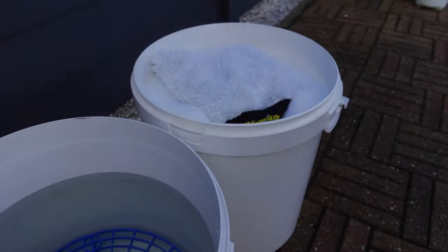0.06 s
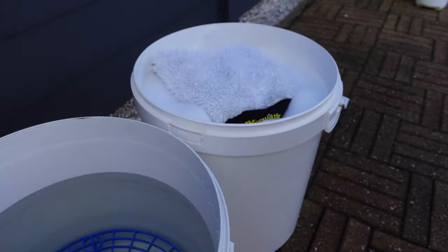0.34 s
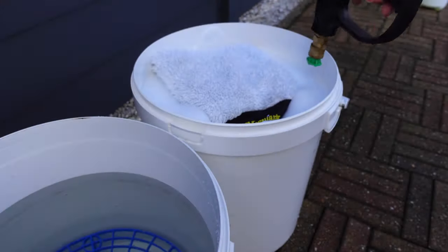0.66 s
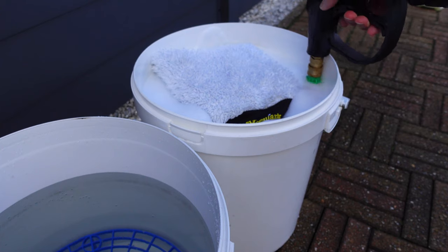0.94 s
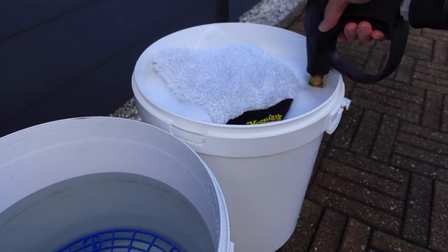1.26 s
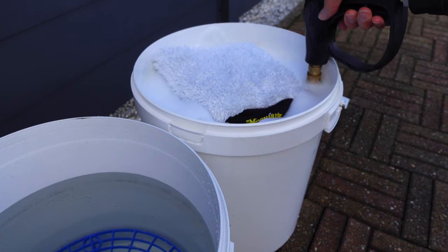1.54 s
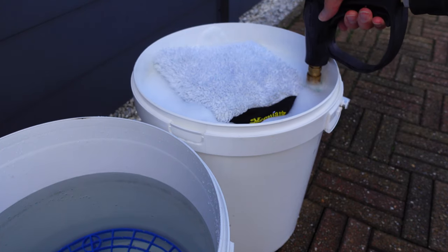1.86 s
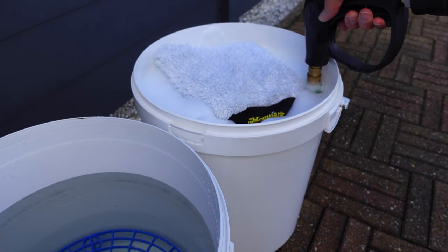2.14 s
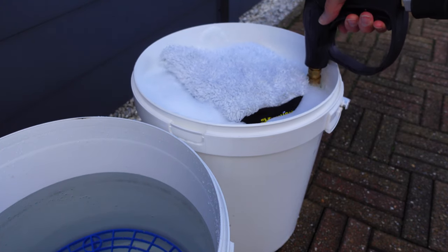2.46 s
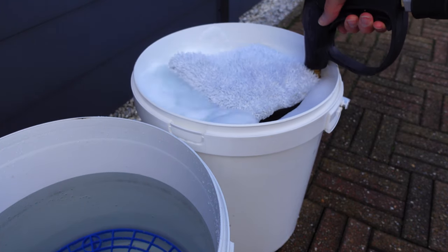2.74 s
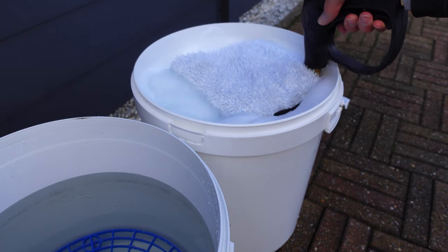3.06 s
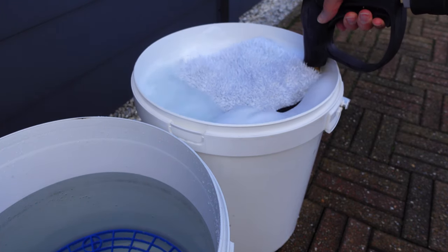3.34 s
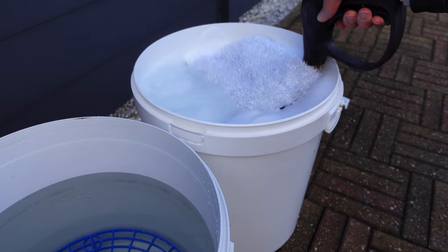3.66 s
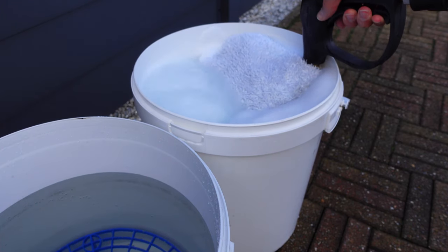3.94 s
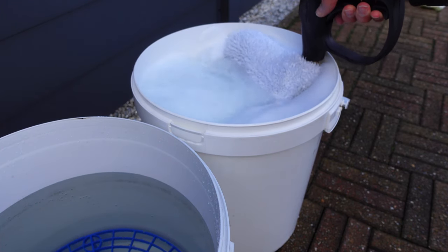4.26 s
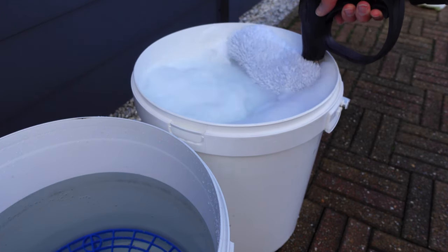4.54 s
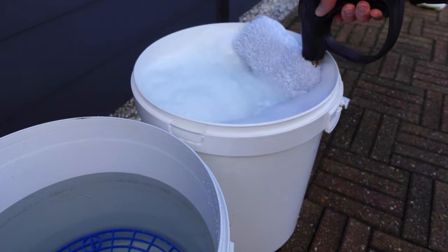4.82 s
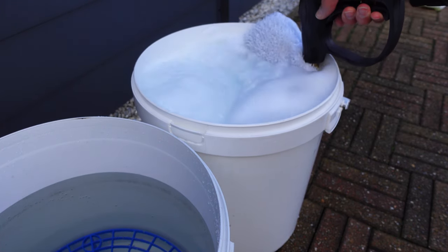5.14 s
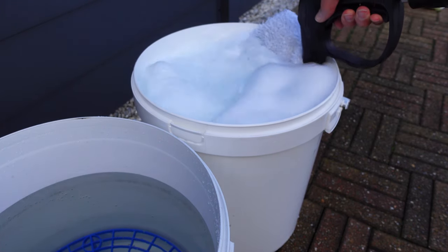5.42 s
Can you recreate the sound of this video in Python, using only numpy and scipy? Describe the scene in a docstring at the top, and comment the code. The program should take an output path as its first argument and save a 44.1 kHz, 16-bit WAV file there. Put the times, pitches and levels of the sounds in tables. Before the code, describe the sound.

Close to the microphone in a quiet yard, a pressure washer foams up a bucket of shampoo water. A faint rustle and a few small plastic taps lead to a snapping trigger and a brief spurt. Then the jet runs continuously, first with bright, crackling hiss and splutters, later smoother and muffled by foam while the bubbling churn grows fuller. The pump hums steadily beneath the water.

```python
"""Faint rustle, then a nozzle tapping plastic: a pressure washer at a bucket of shampoo water.
The bucket stands on a quiet paved yard, close to the stereo microphone and dead centre.
The trigger clicks, the jet spurts once, then hisses and spits until rising foam swallows the nozzle.
Air driven under water churns as a dense cloud of ringing bubbles,
and the pump's pulsation hums through the water."""
import sys
import numpy as np
from scipy import signal
from scipy.fft import rfft, irfft, next_fast_len
from scipy.io import wavfile

SR = 44100
rng = np.random.default_rng(int(sys.argv[2]) if len(sys.argv) > 2 else 0)


def transcribe(u):
    """Save the signal u as a 16-bit wav file named by the first command-line argument.

    u: samples, shape (n,) or (channels, n), limited to [-1, 1]; the rate is SR.
    q: integer samples, one column per channel.
    """
    v = np.clip(np.atleast_2d(u).T, -1, 1)
    q = np.round(v * 32767).astype(np.int16)
    wavfile.write(sys.argv[1], SR, q)


N = 246519

# hush of the yard: (frequency [Hz], relative level [dB])
YARD_SPECTRUM = [(30, -20), (70, -14), (130, -12.5), (250, -16), (470, -14.5), (800, -12), (1000, -7),
                 (1800, -8.5), (2500, -15.5), (3400, -29), (4800, -23), (6500, -17.5), (9000, -15),
                 (15600, -16)]
# side-channel gain for the yard, and for the echoes with the nozzle open and under foam:
# (frequency [Hz], gain [dB])
YARD_WIDTH = [(150, -6), (400, -3), (1200, -9.5), (3500, -11), (8000, -5), (15000, -8)]
OPEN_WIDTH = [(60, -10), (110, -24), (200, -17), (380, -18), (700, -16.5), (1290, -19), (2380, -42),
              (4400, -17.5), (8120, -13), (15000, -25)]
COVERED_WIDTH = [(60, -25), (110, -70), (200, -19), (380, -18.5), (700, -14), (1290, -18), (2380, -23),
                 (4400, -15.5), (8120, -8.5), (15000, -12)]
# faint rustle of the gun, then the rim's short ring after the first tap:
# (time [s], length [s], centre [Hz], level [dB])
RUSTLE_AND_RIM_RING = [(0.172, 0.048, 1060, -60.5), (0.18, 0.06, 190, -60), (0.14, 0.11, 9000, -65),
                       (0.17, 0.64, 9000, -64.5), (0.413, 0.018, 8000, -63), (0.54, 0.18, 170, -69.5),
                       (0.695, 0.019, 232, -57), (0.81, 0.11, 560, -62)]
# pump tones: (multiple of the shaft rate, relative level [dB])
PUMP_ORDERS = [(2, -66), (3, -57.5), (4, -58.5), (5, -56.5), (6, -45.5), (7, -83), (8, -39.5), (9, -44),
               (10, -40.5), (12, -40.5), (13, -47.5)]

# nozzle against the rim: (time [s], level [dB])
RIM_TAPS = [(0.7962, -42.5), (0.857, -52), (0.876, -58), (0.919, -49), (0.982, -50)]
# modes of bucket wall and plastic gun: (frequency [Hz], relative level [dB], multiple of the ring time)
RIM_MODES = [(323, -6, 1.1), (430, -2.5, 2), (617, -10, 1), (713, -1.5, 2.2), (996, -6, 1.1),
             (1550, -10, .8)]
GUN_MODES = [(320, -13, 0.65), (379, -4, 1.4), (520, -11, 0.86), (640, -3, 0.78), (974, -8, 1.4),
             (1520, -17, 1.2), (2050, -17, .5)]
# trigger and valve: (time [s], body level [dB], snap level [dB], ring time [s])
TRIGGER_KNOCKS = [(0.943, -36, -44, 0.086), (0.994, -48, -39, .04), (1.0018, -26.5, -20, 0.056),
                  (1.21, -33, -44, 0.05)]
# a spurt, then steady flow: (start [s], rise [s], stop [s], fall [s])
TRIGGER_PULLS = [(0.996, 0.041, 1.169, 0.069), (1.238, 0.09, 6.0, .06)]

# tone of the bubble cloud: (frequency [Hz], gain [dB])
CHURN_COLOUR = [(130, -42), (200, -23.5), (290, -22.5), (345, -10.5), (400, -5.5), (520, 0), (680, -1),
                (760, -4), (980, 0.5), (1250, -3.5), (1500, 0.5), (1800, -2.5), (2450, -5.5), (2950, -9),
                (3400, -15)]
# coarseness lifts big bubbles and thins small ones: (time [s], shift [dB])
COARSENESS = [(1.05, 2.5), (1.4, 1.5), (3.0, -1.5), (4.1, 0.5), (4.9, 2.5), (5.59, 4.5)]
# slugs of air dragged under: (time [s], length [s], boost [dB], added coarseness [dB])
SURGES = [(1.304, 0.12, 3.5, -4.5), (1.459, 0.15, 4.5, -0.5), (1.56, 0.23, 8, -2), (1.808, 0.21, 6.5, -1),
          (2.158, 0.3, 6, 2), (2.508, 0.25, 5.5, -1), (2.733, 0.19, 4, 1.5), (4.676, 0.37, 3, 0)]
# gulps in the water, and the pump's brief hum as the flow restarts:
# (time [s], length [s], centre [Hz], level [dB])
GULPS_AND_HUM = [(1.01, 0.053, 413, -35.5), (1.012, 0.034, 670, -27.5), (1.05, 0.028, 1400, -38),
                 (1.207, 0.085, 553, -38.5), (1.275, 0.11, 550, -34), (1.6, .05, 1180, -26),
                 (1.675, 0.096, 1030, -25.5), (1.695, 0.057, 557, -28), (1.89, 0.098, 1540, -28.5),
                 (2.185, 0.05, 510, -33.5), (2.25, 0.14, 395, -41), (2.535, 0.12, 1580, -25.5),
                 (2.63, 0.095, 2120, -30), (2.8, 0.091, 568, -26), (2.815, 0.072, 1040, -27.5),
                 (2.935, 0.034, 567, -26.5), (3.12, 0.12, 2220, -33), (4.01, 0.17, 2050, -31.5),
                 (4.72, 0.062, 1130, -22.5), (4.8, 0.1, 1020, -27.5), (4.845, 0.066, 580, -25.5),
                 (5.085, .05, 560, -24), (5.175, 0.058, 560, -26.5)]
# resonances of the bucket, open and foam-filled: (frequency [Hz], width [Hz], boost [dB])
BUCKET_RINGS = [(1030, 280, 3), (1444, 180, 5), (1910, 26, 5), (2230, 120, 6.5), (2410, 105, 5.5),
                (2460, 42, 5.5), (2895, 140, 5.5)]
FOAM_RINGS = [(1130, 41, 5.5), (1360, 37, 4.5), (1525, 32, 0.5), (1634, 48, 2.5), (1900, 55, 2.5),
              (2420, 50, 3.5), (2480, 32, 6)]

# hiss as nozzle and water move against each other: (time [s], relative level [dB])
HISS_LEVEL = [(1.05, -31), (1.3, -33), (1.45, -28.5), (1.63, -36.5), (1.78, -31), (1.96, -32.5),
              (2.12, -25.5), (2.37, -29), (2.53, -33), (2.8, -34.5), (3.02, -30), (3.58, -33), (3.8, -32),
              (4.2, -33.5), (4.32, -37), (4.7, -35.5), (5.1, -39), (5.59, -39)]
# tone of the hiss, open and under foam: (frequency [Hz], gain [dB])
OPEN_HISS = [(1880, 3), (3200, 3.5), (3580, -0.5), (4310, 3.5), (4610, 3), (6630, 3), (9810, -4),
             (13700, -11.5), (15600, -15)]
COVERED_HISS = [(1880, -39), (3200, 3.5), (3650, -3.5), (4100, -0.5), (5230, 1.5), (6720, -2), (8370, -4.5),
                (9060, -7), (11300, -7), (15600, -15)]
# pitch set by the gap between nozzle and water: (time [s], centre [Hz], boost [dB])
GAP_FOCUS = [(1.05, 7500, 12), (1.5, 5130, -4), (2.12, 6700, 8.5), (2.35, 8600, 7), (2.65, 7100, 1),
             (3.0, 5340, 6.5), (4.4, 7000, 4), (5.59, 8500, 4)]
# thin ringing of the nozzle under foam: (frequency [Hz], width [Hz], boost [dB])
NOZZLE_RINGS = [(4210, 140, 3), (4760, 90, -0.5), (5390, 55, 5.5), (6280, 140, -2), (6680, 190, 4),
                (7490, 40, 8), (7660, 160, 3), (9010, 200, 6.5), (9830, 260, 3.5), (11000, 150, 2.5),
                (11500, 70, 6), (13060, 250, 4)]
# the mist chokes for an instant: (time [s], length [s])
CHOKES = [(1.693, 0.018), (1.815, 0.017), (1.968, 0.034), (2.048, 0.028), (2.448, 0.089)]
# the jet tears the surface: (time [s], length [s], centre [Hz], level [dB])
SPITS = [(1.208, .02, 6500, -48), (1.428, 0.043, 13000, -35), (1.497, .022, 11900, -34),
         (1.713, .02, 13000, -30), (1.739, .016, 13500, -35), (1.762, .038, 10900, -32.5),
         (1.803, .013, 11500, -34), (1.868, 0.033, 11700, -25), (1.919, 0.023, 8450, -26.5),
         (1.925, 0.0074, 13000, -29), (1.95, 0.014, 9500, -31), (1.983, 0.012, 9000, -29),
         (2.01, 0.01, 10500, -29), (2.026, 0.01, 11500, -27), (2.148, .012, 12000, -39),
         (2.397, 0.014, 11500, -29), (2.427, 0.016, 10900, -29), (2.486, 0.0082, 9500, -27.5),
         (2.501, 0.0039, 8900, -22.5), (2.519, 0.0055, 9600, -23.5), (2.528, 0.0081, 6540, -27),
         (2.72, 0.051, 11000, -42), (2.81, 0.027, 11000, -44), (2.99, .07, 9900, -39.5),
         (4.2, 0.041, 9500, -40)]
# bounce off the bucket wall, faint under foam: (time [s], delay [s], echo share)
WALL_ECHO = [(1.0, 0.0023, 0.37), (1.5, .0022, 0.77), (1.8, 0.0021, 0.2), (2.5, .0019, 0.25),
             (2.7, 0.0026, .05)]


def from_db(db):
    """Decibels to gain."""
    return 10 ** (np.asarray(db) / 20)


def unit_power(x):
    """Scale to an RMS of 1."""
    return x / np.sqrt(np.mean(x ** 2) + 1e-20)


def in_time(rows):
    """One curve per column after the time, at every sample."""
    times, *columns = np.transpose(rows)
    return [np.interp(np.arange(N) / SR, times, column) for column in columns]


def ramp(start_s, takes_s):
    """Rise from 0 to 1."""
    return np.clip((np.arange(N) / SR - start_s) / takes_s, 0, 1)


def swell(start_s, length_s):
    """One rounded rise and fall, 0 to 1 and back."""
    x = ramp(start_s, length_s)
    return (4 * x * (1 - x)) ** 0.46


def decay(t, t60):
    """Die away by 60 dB in t60 seconds."""
    return from_db(-60 * t / t60)


def drift(rate_hz):
    """Smooth random wander of spread 1."""
    step, settle = 40, 2000
    pole = np.exp(-2 * np.pi * step * rate_hz / SR)
    noise = rng.standard_normal(N // step + settle + 2)
    slow = signal.lfilter([1], [1, -2 * pole, pole * pole], noise)[settle:]
    return np.interp(np.arange(N) / step, np.arange(len(slow)), unit_power(slow))


def colour(x, points):
    """Filter by a curve of (frequency [Hz], gain [dB])."""
    size = next_fast_len(N + SR // 4)
    hz, db = np.transpose(points)
    gain = from_db(np.interp(np.log(np.fft.rfftfreq(size, 1 / SR) + 1), np.log(hz), db))
    return irfft(rfft(x, size) * gain, size)[..., :N]


def band(x, low_hz, high_hz, order=2):
    """Band-pass, unit power."""
    edges = np.clip([low_hz, high_hz], 10, .49 * SR)
    return unit_power(signal.sosfilt(signal.butter(order, edges, "band", fs=SR, output="sos"), x))


def ring(clicks, hz, t60):
    """Each click sets a damped tone ringing."""
    radius, angle = from_db(-60 / (t60 * SR)), 2 * np.pi * hz / SR
    return signal.lfilter([1, 0, -1], [1, -2 * radius * np.cos(angle), radius ** 2], clicks + 1e-18)


def resonate(x, peaks):
    """Lift narrow resonances out of a sound."""
    return x + sum((from_db(db) - 1) * signal.lfilter(*signal.iirpeak(hz, hz / width, fs=SR), x)
                   for hz, width, db in peaks)


def grains(per_s, spread_db):
    """Random clicks of uneven size."""
    sizes = from_db(spread_db * np.minimum(rng.exponential(1, N), 4)) * rng.choice([-1, 1], N)
    return sizes * (rng.random(N) < per_s / SR)


def bursts(rows, band_ratio, spread_db=1.5, edge_share=0.52):
    """Puffs of dense clicks, each around its own pitch; a small edge share makes them abrupt."""
    out = np.zeros(N)
    clicks = grains(30000, spread_db)
    for s, length_s, hz, db in rows:
        at, size = int(s * SR), int(length_s * SR)
        puff = unit_power(band(clicks[:at + size], hz / band_ratio, hz * band_ratio)[at:])
        out[at:at + size] += from_db(db) * puff * signal.windows.tukey(size, edge_share)
    return out


def foam_cover():
    """Share of the nozzle that the rising foam covers."""
    return ramp(start_s=2.64, takes_s=0.49)


def by_cover(in_open, under_foam):
    """Pass from one value to the other as the foam covers the nozzle."""
    return in_open + (under_foam - in_open) * foam_cover()


def flow(dribble=0.045):
    """Water through the nozzle, 0 to 1; it sinks to a dribble between pulls."""
    pulled = sum(ramp(start, rise) * (1 - ramp(stop - fall, fall))
                 for start, rise, stop, fall in TRIGGER_PULLS)
    return np.maximum(pulled, dribble * np.maximum.accumulate(pulled))


def yard(level_db=-58):
    """The faint hush all round the microphone, as mid and side."""
    mid, side = from_db(level_db) * unit_power(colour(rng.standard_normal((2, N)), YARD_SPECTRUM))
    return mid, colour(side, YARD_WIDTH)


def reflections(x, t60, count):
    """Early echoes off bucket, paving and wall, within a few metres, as strong as the direct sound."""
    lags_s = rng.uniform(.002, .04, count)
    response = np.zeros(SR // 20)
    response[(lags_s * SR).astype(int)] = rng.choice([-1, 1], count) * decay(lags_s, t60)
    return signal.fftconvolve(x, response / np.linalg.norm(response))[:N]


def rustle_and_rim_ring():
    """Faint rustle of the gun, then the rim's short ring after the first tap."""
    return bursts(RUSTLE_AND_RIM_RING, band_ratio=1.48)


def pump(shaft_hz=67.47, waver=0.00138, flutter_db=3.0):
    """Piston strokes pulse the jet; the moving water makes each tone swell and fade."""
    turns = np.cumsum(shaft_hz * (1 + waver * drift(1.58))) / SR
    tones = sum(from_db(db + flutter_db * drift(5.2)) * np.sin(2 * np.pi * (k * turns + rng.random()))
                for k, db in PUMP_ORDERS)
    fade_in = ramp(start_s=1.2, takes_s=0.2) ** 2
    return np.sqrt(2) * fade_in * from_db(by_cover(-6.5, -0.5)) * tones


def knock(modes, ring_s, rattle_db, crack_db, split=0.046):
    """Struck plastic: a hollow ring of modes in beating pairs, a dull rattle and a brief crack."""
    t = np.arange(SR // 3) / SR
    body = 0
    for hz, db, ring_scale in modes:
        for side in (-1, 1):
            envelope = from_db(db + rng.normal(0, 1)) * decay(t, ring_scale * ring_s)
            split_hz = hz * (1 + split * side * rng.uniform(.4, 1.6))
            body += envelope * np.sin(2 * np.pi * split_hz * t) * rng.choice([-1, 1])
    rattle = band(rng.standard_normal(len(t)), 350, 1260, order=3) * decay(t, ring_s)
    crack = band(rng.standard_normal(len(t)), 550, 2200, order=4) * decay(t, 0.012)
    return body / np.sqrt(2) + from_db(rattle_db) * rattle + from_db(crack_db) * crack


def taps_and_trigger():
    """Close up, the nozzle taps the rim; trigger and valve knock, each with a bright snap."""
    out, t = np.zeros(N), np.arange(SR // 3) / SR
    for s, db in RIM_TAPS:
        at = int(s * SR)
        out[at:at + len(t)] += from_db(db) * knock(RIM_MODES, ring_s=0.09, rattle_db=-6, crack_db=-6)
    snap_fade = decay(t, 0.004) + from_db(-5) * decay(t, 0.034)   # the snap leaves a short sizzle
    for s, body_db, snap_db, ring_s in TRIGGER_KNOCKS:
        at = int(s * SR)
        snap = band(rng.standard_normal(len(t)), 7100, 20000, order=1) * snap_fade
        body = knock(GUN_MODES, ring_s, rattle_db=-2.5, crack_db=0.5)
        out[at:at + len(t)] += from_db(body_db) * body + from_db(snap_db) * snap
    low_cut = signal.butter(4, 260, "high", fs=SR, output="sos")   # small parts radiate no bass
    return signal.sosfilt(low_cut, out)


def gulps_and_hum():
    """Gulps in the water, and the pump's brief hum as the flow restarts."""
    return bursts(GULPS_AND_HUM, band_ratio=1.166)


def rumble(shallow_db=-78, deep_db=-48):
    """Large pockets of air thud once the jet reaches deep into the bucket."""
    level_db = shallow_db + (deep_db - shallow_db) * ramp(start_s=4.55, takes_s=0.38)
    return from_db(level_db) * band(grains(1000, spread_db=9.0), 147, 350)


def bubbles(low_hz, high_hz, per_s, cycles, surge_db, sizes=14):
    """Bubbles of one size range pinch off in surges and ring for some cycles each."""
    births = grains(per_s, spread_db=2.0) * from_db(surge_db * drift(19))
    size_index = rng.integers(0, sizes, N)
    cloud = sum(np.sqrt(hz) * unit_power(ring(births * (size_index == k), hz, cycles / hz))
                for k, hz in enumerate(np.geomspace(low_hz, high_hz, sizes)))
    return band(colour(cloud, CHURN_COLOUR), low_hz, high_hz, order=5)


def churn(open_db=-31.5, covered_db=-26):
    """The jet drives air under; the bubbles reach the microphone through the bucket's hollow."""
    surge_db, surge_coarse_db = sum(np.outer([boost, coarse], swell(s, length_s))
                                    for s, length_s, boost, coarse in SURGES)
    level_db = by_cover(open_db, covered_db) + surge_db
    coarse_db = in_time(COARSENESS)[0] + surge_coarse_db
    small_db = -6 - coarse_db - 0.56 * (level_db - covered_db)   # small bubbles swing less in level
    big = from_db(coarse_db - 5) * bubbles(162, 731, per_s=4400, cycles=10.8, surge_db=0.6)
    middle = from_db(-0.4) * bubbles(694, 1856, per_s=5200, cycles=20.7, surge_db=0.13)
    small = from_db(small_db) * bubbles(1745, 3044, per_s=7000, cycles=19.5, surge_db=0.86)
    flutter_db = by_cover(1.23, -0.6) * drift(50)
    cloud = from_db(level_db + flutter_db) * (big + middle + small)
    hollow = from_db(-2.5) * resonate(cloud, BUCKET_RINGS)
    foamy = from_db(-1) * resonate(cloud, FOAM_RINGS)
    return flow() ** 0.62 * (by_cover(hollow, foamy) + rumble())


def droplets(low_hz, high_hz, per_s, spread_db, flutter_db):
    """Countless impacts; foam steadies them and lets the nozzle ring, more as the jet goes deeper."""
    covered = foam_cover()
    in_air = band(colour(grains(per_s, spread_db), OPEN_HISS), low_hz, high_hz, order=6)
    impacts = grains(per_s, spread_db)
    ring_share = 0.49 + 0.51 * ramp(start_s=3.33, takes_s=0.73)
    impacts += ring_share * (resonate(impacts, NOZZLE_RINGS) - impacts)
    in_foam = band(colour(impacts, COVERED_HISS), low_hz, high_hz, order=6)
    flutter = from_db(flutter_db * by_cover(1.5, 0.66) * drift(33))
    return (np.sqrt(1 - covered) * in_air + np.sqrt(covered) * in_foam) * flutter


def gap_focus(x, width_octaves=0.36, count=9):
    """The gap between nozzle and water shapes the hiss around a gliding pitch, at constant power."""
    centre_hz, boost_db = in_time(GAP_FOCUS)
    pitches, size = np.geomspace(3250, 9500, count), next_fast_len(N)
    spectrum, bins = rfft(x, size), np.fft.rfftfreq(size, 1 / SR)
    out, power = 0, 0
    for hz, weights in zip(pitches, np.eye(count)):
        part = irfft(spectrum * np.interp(bins, pitches, weights), size)[:N]
        gain = from_db(boost_db * np.exp(-.5 * (np.log2(hz / centre_hz) / width_octaves) ** 2))
        out += gain * part
        power += gain ** 2 * np.mean(part * x)
    return out / np.sqrt(power)


def mist(hiss_db, usual_hiss_db=-27.5):
    """Fine spray thickens as the surface is whipped up; in the open it crackles and tracks the hiss."""
    level_db = by_cover(-32, -43.5) + by_cover(0.99, 0.16) * (hiss_db - usual_hiss_db)
    thin_db = -3.5 * (1 - ramp(start_s=1.0, takes_s=0.65))
    crackle_db = by_cover(1.5, 0) * drift(90)
    choke_db = -10 * sum(swell(s, length_s) for s, length_s in CHOKES)
    spray = droplets(8900, 24500, per_s=17000, spread_db=2.5, flutter_db=1.0)
    return from_db(level_db + thin_db + crackle_db + choke_db) * spray


def wall_echo(x, waver=0.022):
    """One bounce off the bucket wall combs the sound; its delay wavers as the hand shakes."""
    delay_s, share = in_time(WALL_ECHO)
    delay_s *= 1 + waver * drift(3.6)
    echo = np.interp(np.arange(N) - delay_s * SR, np.arange(N), x, left=0)
    return (x - share * echo) / np.sqrt(1 + share ** 2)


def jet():
    """Right in front of the microphone the jet hits the water: hiss, mist and spits, with echoes."""
    hiss_db, = in_time(HISS_LEVEL)
    impacts = droplets(2470, 10300, per_s=18000, spread_db=2.0, flutter_db=1.5)
    hiss = from_db(hiss_db - 2) * gap_focus(impacts)
    spray = flow() ** 0.88 * (hiss + mist(hiss_db))
    direct = spray + bursts(SPITS, band_ratio=1.31, spread_db=7.5, edge_share=0.063)
    return wall_echo(direct + from_db(-13) * reflections(direct, t60=0.032, count=60))


def scene():
    """The bucket is close and central; reflections and the yard's hush give a little width."""
    close = churn() + gulps_and_hum() + jet() + taps_and_trigger() + rustle_and_rim_ring()
    mid = close + from_db(-14) * reflections(close, t60=0.1, count=80) + pump()
    scattered = reflections(mid, t60=0.097, count=120)
    side = by_cover(colour(scattered, OPEN_WIDTH), colour(scattered, COVERED_WIDTH))
    yard_mid, yard_side = yard()
    mid, side = mid + yard_mid, side + yard_side
    return np.array([from_db(0.01) * (mid + side), from_db(-0.13) * (mid - side)])


def record(dry, cutoff_hz=15750):
    """The microphone signal is cut steeply at the top."""
    return signal.sosfilt(signal.ellip(12, .1, 80, cutoff_hz, fs=SR, output="sos"), dry)


dry = scene()
out = record(dry)
transcribe(out)
```